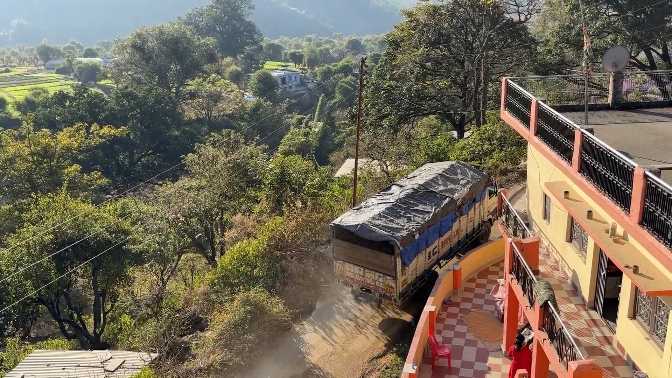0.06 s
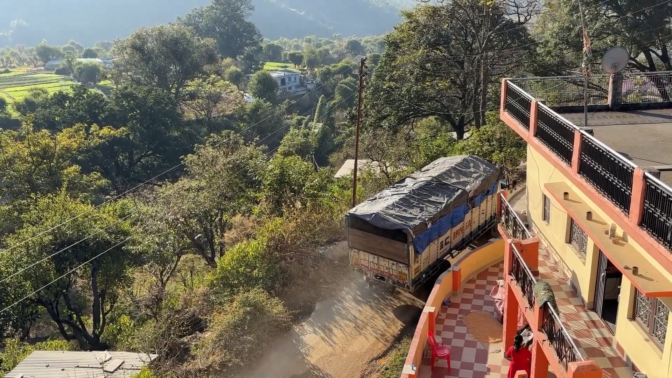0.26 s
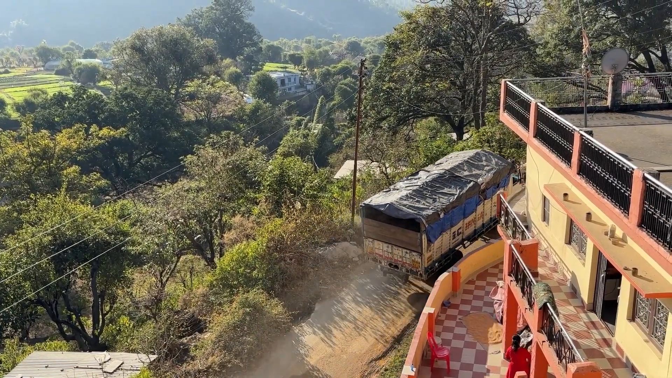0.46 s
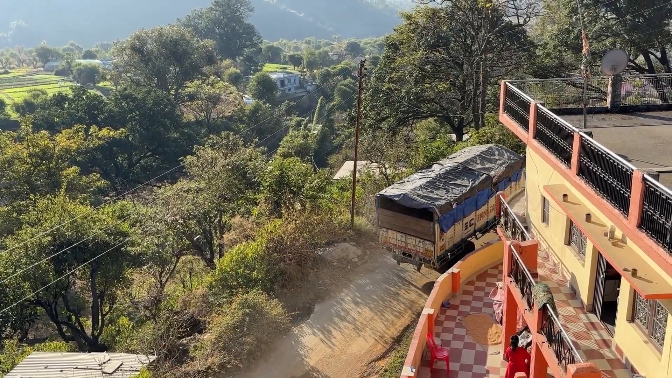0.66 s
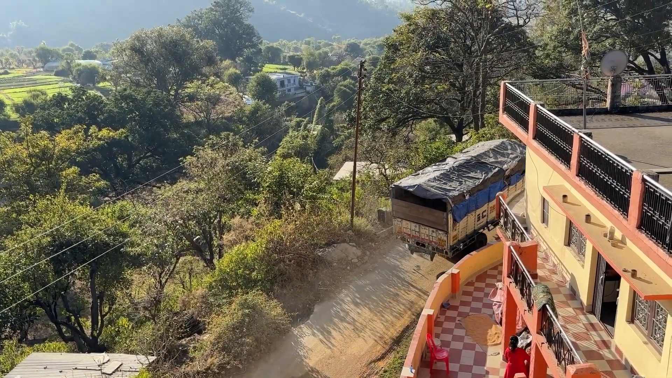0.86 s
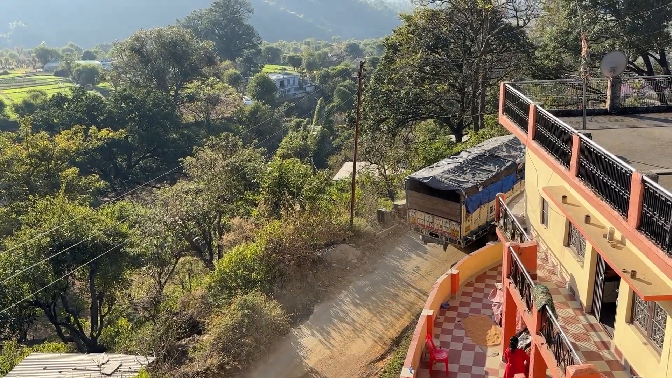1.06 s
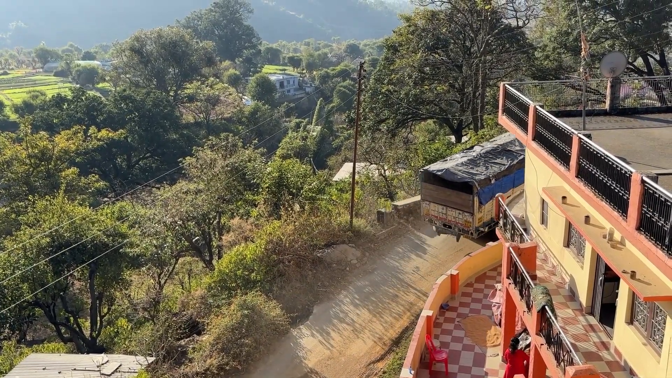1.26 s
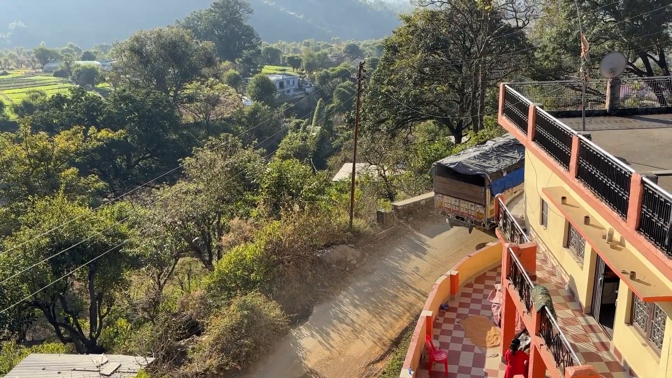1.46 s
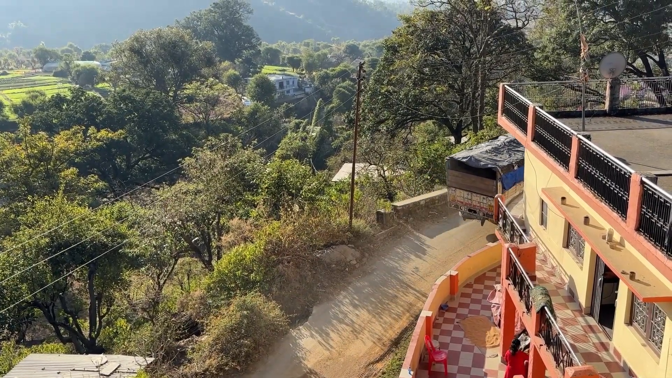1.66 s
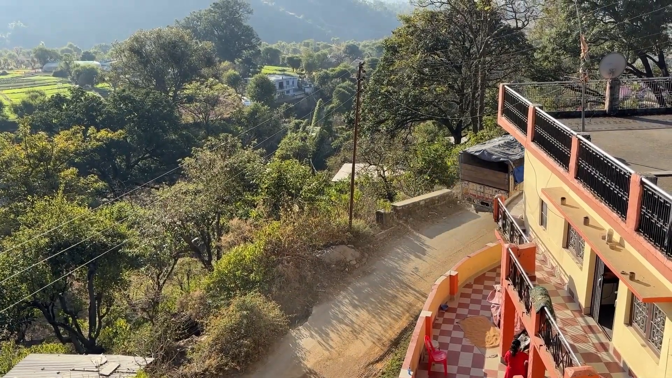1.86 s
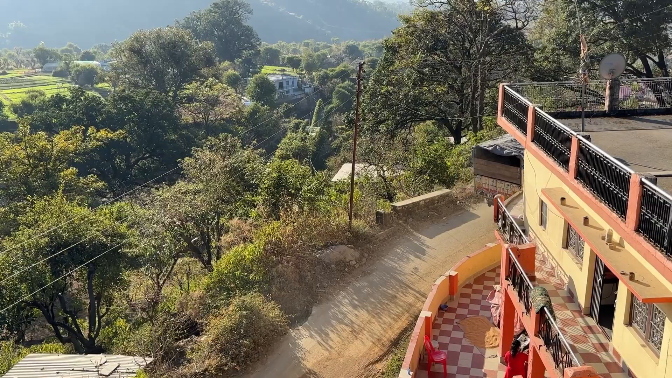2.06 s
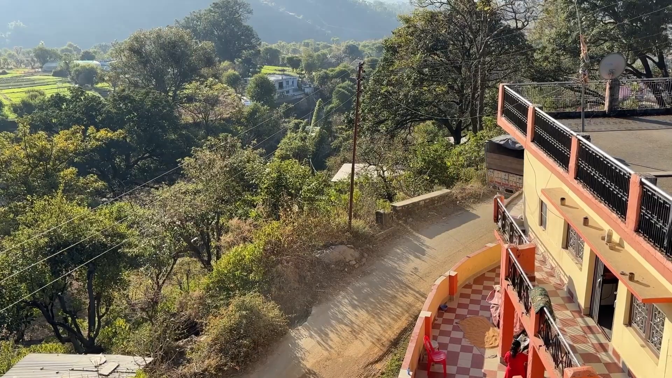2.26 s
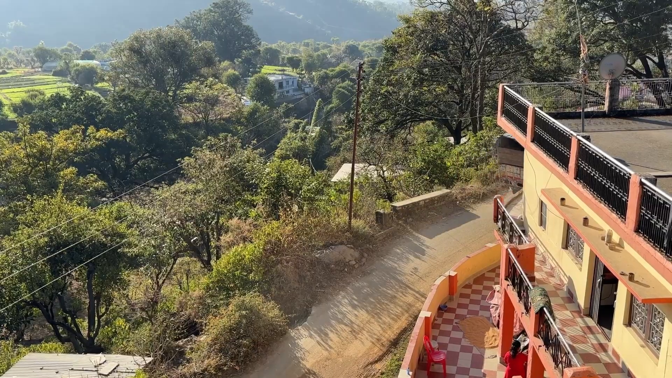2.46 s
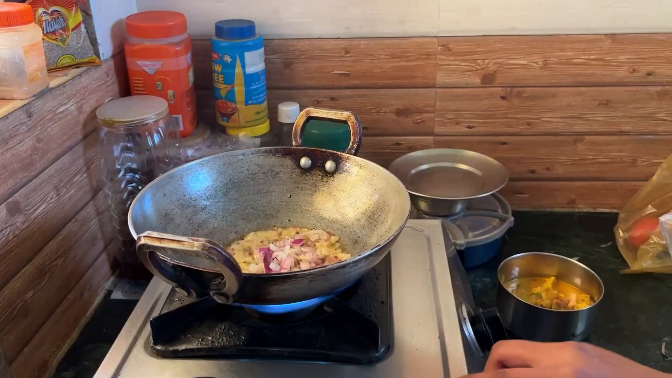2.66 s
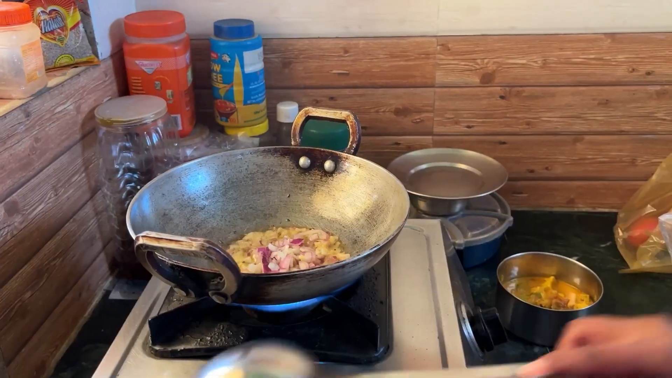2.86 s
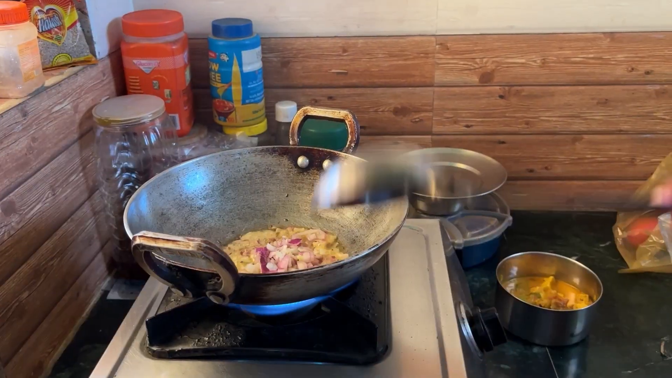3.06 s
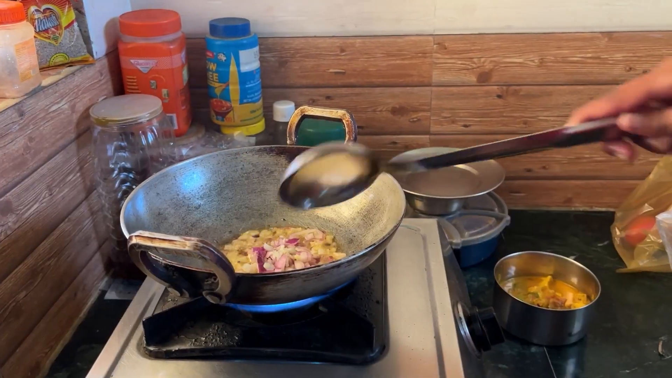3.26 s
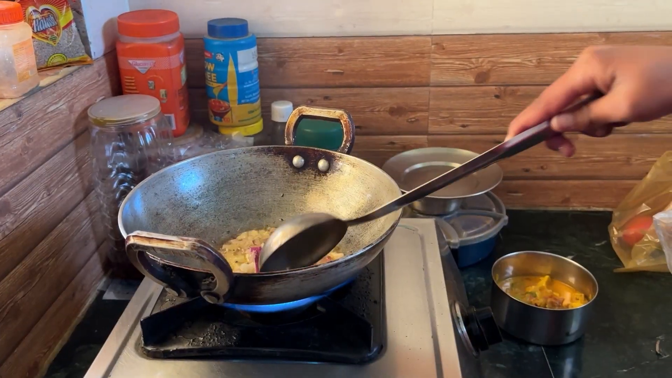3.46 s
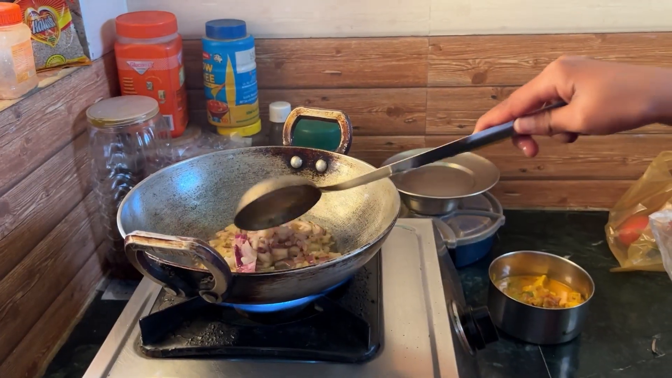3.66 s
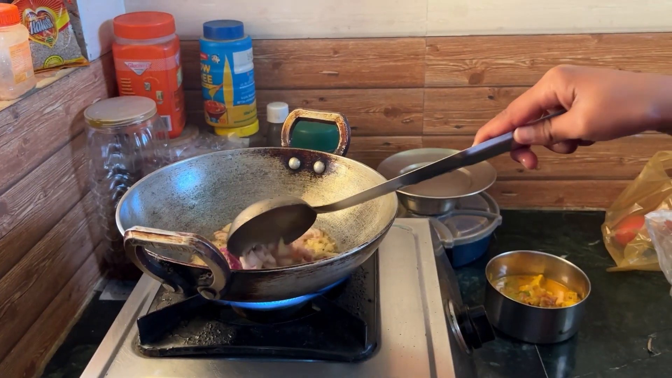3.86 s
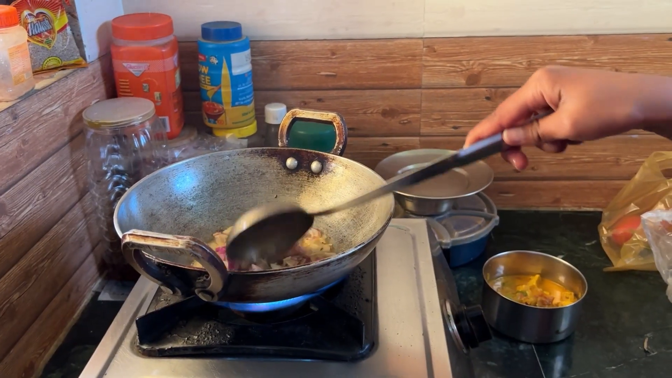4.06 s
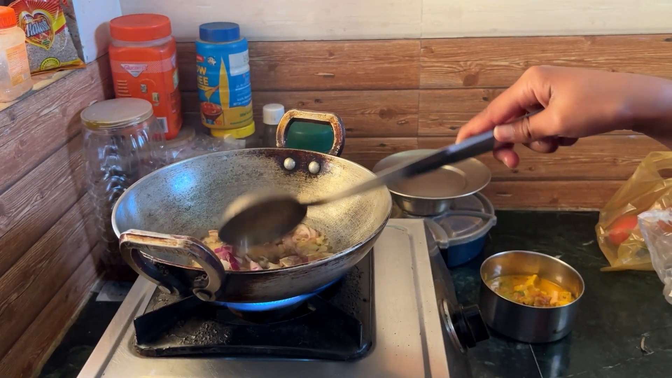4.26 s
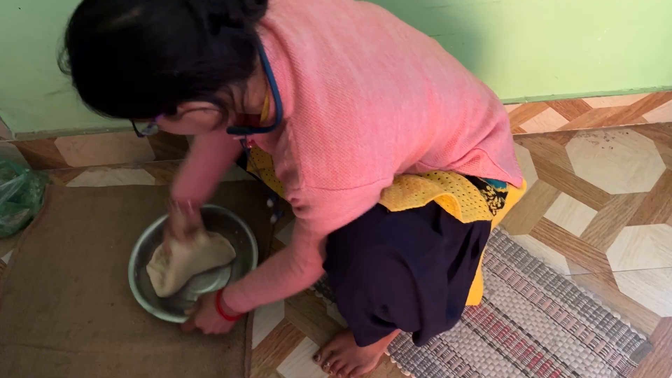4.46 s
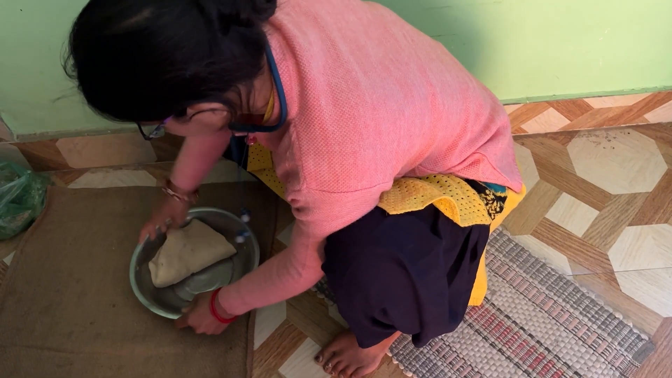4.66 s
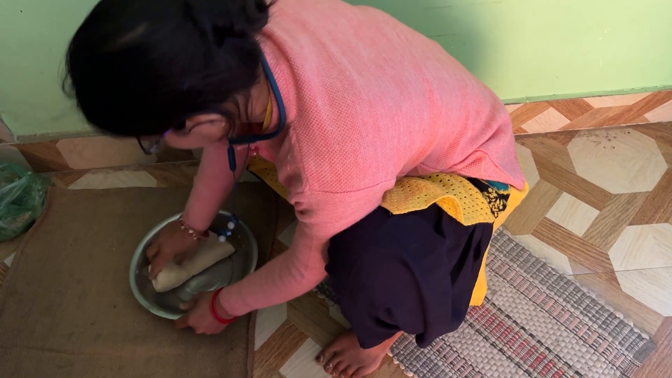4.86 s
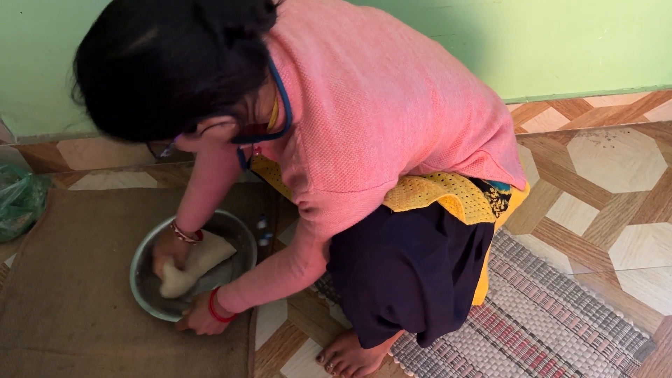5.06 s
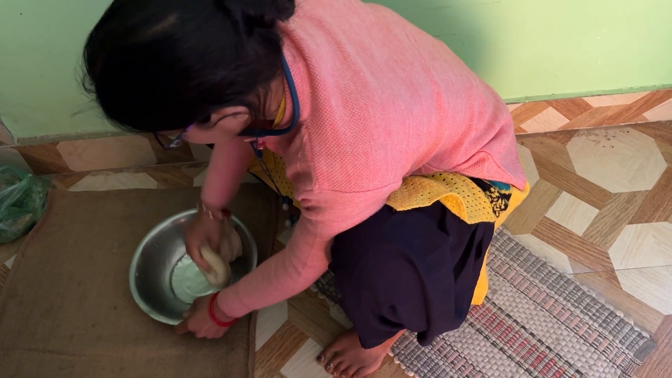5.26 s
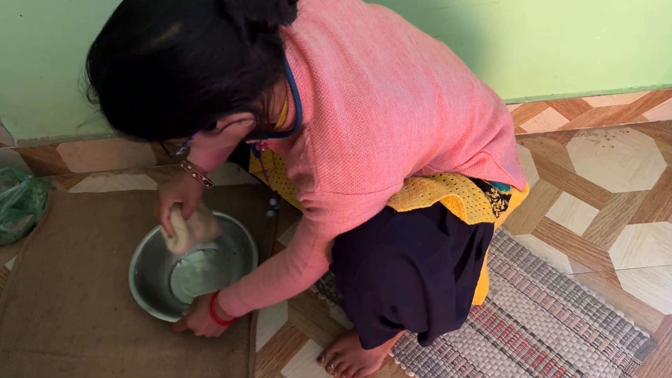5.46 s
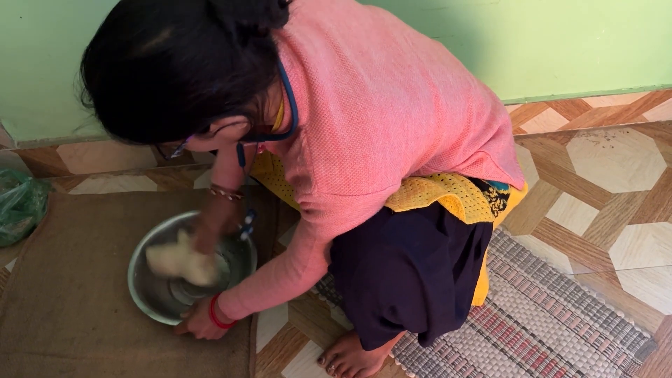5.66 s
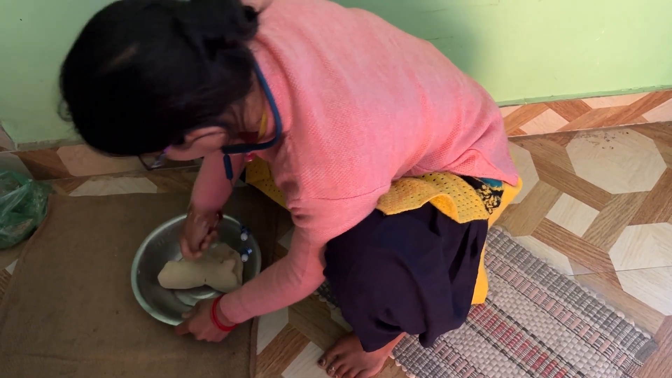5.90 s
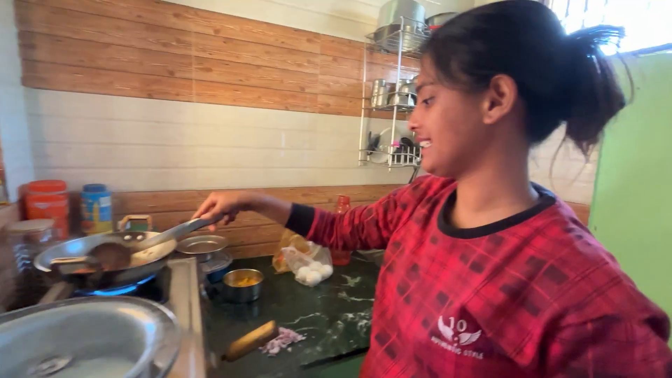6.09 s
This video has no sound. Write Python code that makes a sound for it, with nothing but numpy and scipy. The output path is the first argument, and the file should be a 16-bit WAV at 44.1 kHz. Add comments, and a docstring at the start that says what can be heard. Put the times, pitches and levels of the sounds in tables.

```python
"""Four village places, cut hard one to the next, heard in stereo through a phone's two ports.
In the lane a diesel lorry draws away behind a house: firing tones, puffed noise and a turbo whistle.
Then onions fry in a steel wok: showers of tiny bursts, snapping drops, ladle thuds, scrapes and hums.
Then, in a small room, dough is rubbed and thumped in a steel bowl whose knocks ring modes and walls.
The last place is a loud, steady rush of coloured noise."""
import sys
import numpy as np
from scipy import signal
from scipy.fft import rfft, irfft, next_fast_len
from scipy.io import wavfile
from scipy.ndimage import map_coordinates

SR = 44100
rng = np.random.default_rng(int(sys.argv[2]) if len(sys.argv) > 2 else 0)


def to_wav(sig):
    """Store sig (one row per channel, or 1-D mono) as 16-bit WAV at the path in sys.argv[1].

    Samples outside -1..1 are clipped; the rate is SR.
    """
    pcm = np.clip(np.atleast_2d(sig), -1, 1) * 32767
    pcm = np.round(pcm).astype(np.int16)
    wavfile.write(sys.argv[1], SR, pcm.T)  # frames by channels


N = 270327
TOP_HZ = 15950  # the phone's band limit

# where lane, kitchen and small room end: t/s
PLACE_ENDS = [2.523, 4.4635, 6.062]
# how widely the kitchen spreads around the microphone: f/Hz, side level/dB
WOK_WIDTH = [(60, -24), (200, -16), (380, -8.5), (700, -7), (1290, 1.5), (2380, -13), (4400, -6.5),
             (5600, 2), (8120, 10), (11000, -13.5), (15000, -5)]
# how widely the small room spreads: f/Hz, side level/dB
ROOM_WIDTH = [(60, -16), (300, -3.5), (1200, -1.5), (5000, 0.5), (12000, -3.5)]
# stirring spreads the onions over the hot steel: from t/s, to t/s
STIRRING = (3.2, 3.95)
BUBBLING_RISE_DB = 8  # gained by stirring
# the ladle is handled and pushed through the food: t/s, thud level/dB before a trim, sizzle flare/dB
LADLE_PUSHES = [(2.912, -41.5, 2.5), (2.955, -45, 2.5), (2.99, -54, 0), (3.068, -45.5, -0.5),
                (3.285, -72.5, 0.5), (3.45, -48, 1), (3.555, -73, 3.5), (3.67, -70, 1), (3.819, -41, 1),
                (3.977, -39, 4.5), (4.122, -42, 2.5), (4.295, -45, 0.5)]


def amp(db):
    """Decibels to gain."""
    return 10 ** (np.asarray(db) / 20)


def unit(x):
    """Scaled to rms 1."""
    return x / np.sqrt(np.mean(x ** 2) + 1e-20)


def along(points, hz):
    """(f/Hz, value) points read on a log frequency axis."""
    f, v = np.transpose(points)
    return np.interp(np.log(hz + 1), np.log(f + 1), v)


def curves(rows):
    """One value per sample for each column after the time."""
    s, *cols = np.transpose(rows)
    return [np.interp(np.arange(N) / SR, s, c) for c in cols]


def since(s):
    """Seconds after a moment, zero before it."""
    return np.maximum(np.arange(N) / SR - s, 0)


def wobble(rate):
    """A smooth random curve, rate knots a second."""
    knots = rng.standard_normal(int(N * rate / SR) + 4)
    return map_coordinates(knots, [np.arange(N) * rate / SR])


def fade(t, t60):
    """Free decay, 60 dB down after t60."""
    return np.exp(-np.log(1000) * t / t60)


def strokes(rows, edge_s):
    """Gain of (t/s, length/s, level/dB) strokes: each swells, holds and fades."""
    t = since(0)
    return sum(amp(db) * np.clip(np.minimum(t - s, s + length - t) / edge_s, 0, 1)
               for s, length, db in rows)


def add(track, s, sound):
    """Mix a sound into a track at a time."""
    part = track[..., round(s * SR):][..., :sound.shape[-1]]
    part += sound[..., :part.shape[-1]]


def filtered(x, response):
    """x times a complex response of frequency."""
    m = next_fast_len(N + SR // 2)
    return irfft(rfft(x, m) * response(np.fft.rfftfreq(m, 1 / SR)), m)[..., :N]


def causal(points, size=2048):
    """The minimum-phase impulse response of a spectrum, by folding its cepstrum."""
    cepstrum = irfft(np.log(amp(along(points, np.fft.rfftfreq(size, 1 / SR)))))
    cepstrum[1:size // 2] *= 2
    cepstrum[size // 2 + 1:] = 0
    return irfft(np.exp(rfft(cepstrum)))


def noise():
    """Two unrelated white noises."""
    return rng.standard_normal((2, N))


def crackle(rate, scatter_db):
    """Two streams of tiny bursts, rate a second, a few far bigger than the rest."""
    size_db = scatter_db * np.minimum(rng.exponential(size=(2, N)), 4.5)
    bursts = rng.random((2, N)) < rate / SR
    return unit(bursts * amp(size_db) * np.sign(noise()))


def spread(pair, spectrum, width, direct=0):
    """Colour two streams into stereo, mid rms 1; direct sound leads at one port (positive: left)."""
    direct = np.clip(direct, -1, 1)
    mid, stray = filtered(pair, lambda hz: amp(along(spectrum, hz)))
    side = filtered(mid, lambda hz: 1j * direct * amp(along(width, hz)))
    side += filtered(stray, lambda hz: np.sqrt(1 - direct ** 2) * amp(along(width, hz)))
    return np.array([mid + side, mid - side]) / np.std(mid)


def ports(x, lead_ms):
    """A source off to one side reaches the left port earlier by lead_ms (negative: later)."""
    return filtered(x, lambda hz: np.exp(np.outer([1j, -1j], np.pi * hz * lead_ms / 1000)))


def walls(x, reach_s, strength, count=10):
    """Weak early copies from nearby surfaces ripple the spectrum."""
    taps = np.zeros(SR // 10)
    taps[0] = 1
    delays = np.clip(rng.uniform(.15, 1, count) * reach_s, 0, .09)
    taps[(delays * SR).astype(int)] += strength * rng.choice([-1, 1], count)
    return signal.fftconvolve(x, taps[None], axes=1)[:, :N]


def echo(sound, t60s, build_s=0.0022):
    """The walls' diffuse answer to one sound, partly shared by both ports."""
    hz, t, z = signal.stft(rng.standard_normal((2, SR // 2)), SR, nperseg=256)
    z[1] *= amp(along(ROOM_WIDTH, hz))[:, None]
    decaying = z * fade(t, along(t60s, hz)[:, None])
    mid, side = signal.istft(decaying, SR, nperseg=256)[1]
    build_up = 1 - np.exp(-(np.arange(len(mid)) / SR / build_s) ** 2)
    tail = np.array([mid + side, mid - side]) * build_up
    return signal.fftconvolve(sound[None], tail / np.linalg.norm(tail[0]), axes=1)


def lorry_levels():
    """Boom, exhaust and clatter in dB: all sink with distance, and the exhaust surges under load."""
    # boom, exhaust and clatter as the lorry recedes: starting level/dB before trims, loss/dB per s
    receding = [(-33.5, 2), (-24.5, 4), (-41.5, 5.5)]
    # the exhaust surges: t/s, level/dB
    surges = [(.19, 1.5), (.75, 0.5), (.92, 1.5), (1.06, 1.5), (1.29, 1.5), (1.85, 0.5)]
    surge_s = 0.064  # from the peak to 1/e of it
    t = since(0)
    boom_db, exhaust_db, clatter_db = [db - loss * t for db, loss in receding]
    surge_db = sum(db * np.exp(-((t - s) / surge_s) ** 2) for s, db in surges)
    return boom_db, exhaust_db + surge_db, clatter_db


def lorry(cylinder_db=-1.02, waver_db=3.0, tones_db=0.06):
    """A diesel: low boom, droning pipe, a puff of exhaust and a rattle at every firing."""
    # engine speed: t/s, firing rate f/Hz
    speed = [(0, 74.7), (1.8, 74.6), (2.15, 73.7), (2.5, 73.4)]
    # boom tones: multiple of the firing rate, level/dB
    boom_orders = [(0.748, -15), (1.001, -1.5), (1.501, -15), (1.998, -17)]
    # weaker pipe tones: multiple of the firing rate, level/dB
    drone_orders = [(3.75, -20.5), (4, -19.5), (4.17, -18), (5, -15), (6.71, -18.5), (7.5, -23)]
    # three loud pipe and driveline tones: multiples of the firing rate
    loud_orders = [3, 3.36, 5.55]
    # those three tones, before trims: t/s, level/dB, level/dB, level/dB
    loud_levels = [(0.0, -32.5, -35, -28.5), (0.09, -31, -26, -27.5), (0.33, -35.5, -51, -37.5),
                   (0.49, -32.5, -28, -41), (0.65, -32.5, -34.5, -38), (0.69, -37, -31.5, -47),
                   (0.77, -34.5, -28, -28), (0.88, -32, -34.5, -45), (1.15, -45, -35.5, -36),
                   (1.4, -37, -41.5, -45.5), (1.91, -37.5, -39, -40), (2.04, -37, -41.5, -54),
                   (2.35, -43, -47, -45.5), (2.501, -37.5, -35.5, -43)]
    # exhaust colour: f/Hz, level/dB
    pipe_spectrum = [(25, -52), (50, -10), (100, -15.5), (190, -8), (235, -3), (310, -2), (400, -3.5),
                     (470, -11), (620, -13), (830, -12), (1200, -22), (2000, -39), (5000, -82)]
    # rattle colour: f/Hz, level/dB
    clatter_spectrum = [(300, -39), (800, 2.5), (1300, 8), (1900, 0.5), (2450, 3), (3700, -4.5), (4700, -8),
                        (5400, -8), (6700, -13), (7500, -60), (8400, -20.5), (11500, -22), (13500, -33),
                        (16000, -33)]
    # scatter from trees and house: f/Hz, side level/dB
    lane_width = [(60, -35), (200, -50), (700, -13), (2000, -3), (5000, -8), (15000, 2.5)]

    firing_hz, = curves(speed)
    boom_db, exhaust_db, clatter_db = lorry_levels()
    phase = 2 * np.pi * np.cumsum(firing_hz) / SR

    def tone(order):
        drifting = order * (phase + .024 * wobble(30))
        return np.sqrt(2) * np.sin(drifting + 2 * np.pi * rng.random())

    boom = amp(boom_db - 0.5) * sum(amp(db + 0.7 * wobble(13.0)) * tone(k) for k, db in boom_orders)
    drone = amp(exhaust_db) * sum(amp(db + waver_db * wobble(9.09)) * tone(k) for k, db in drone_orders)
    drone += sum(amp(db + tones_db) * tone(k) for k, db in zip(loud_orders, curves(loud_levels)))

    # unequal cylinders: the puffs swell once in every four firings, and no two burns are alike
    burn_db = cylinder_db * np.cos(phase / 4) + .5 * wobble(firing_hz.mean())
    gate = 1 + .09 * (np.cos(phase) + np.cos(2 * phase))
    puffs = unit(gate * amp(burn_db))
    exhaust = amp(exhaust_db - 2.5) * spread(puffs * noise(), pipe_spectrum, lane_width)
    # only the pipe's low notes throb unevenly
    low_notes = filtered(exhaust, lambda hz: 1 / (1 + (hz / 450) ** 8))
    exhaust += (amp(1.6 * wobble(32)) - 1) * low_notes

    rattle = walls(puffs * noise(), reach_s=.02, strength=0.093)
    clatter = amp(clatter_db + 6.0) * spread(rattle, clatter_spectrum, lane_width)
    # the house slides in front of the engine and shades its treble
    hidden, = curves([(.8, 0.019), (2.5, 0.58)])
    clatter -= hidden * filtered(clatter, lambda hz: 1 / (1 + (6000 / (hz + 1)) ** 4))
    leaning = (drone + exhaust) * amp([[-1], [.8]])  # left, right in dB
    return boom + ports(leaning + clatter, lead_ms=-0.25)


def turbo(flutter_hz=130):
    """The turbocharger's thin, fluttering whistle sinks in pitch, swells once and fades away."""
    # t/s, f/Hz, level/dB over the untrimmed clatter
    whistle_rows = [(0, 12350, -29), (.75, 12280, -24), (1.05, 12150, -32), (1.5, 12000, -45)]
    hz, over_db = curves(whistle_rows)
    whistle = np.sin(2 * np.pi * np.cumsum(hz + flutter_hz * wobble(500)) / SR)
    return amp(lorry_levels()[2] + over_db) * whistle


def sizzle_levels():
    """Fizz and bubbling in dB: both grow with the stirring and flare when wet food meets hot steel."""
    flare_s = 0.024  # a flare peaks after this long
    stirred = np.interp(since(0), STIRRING, [0, 1])
    flare_db = sum(db * since(s) / flare_s * np.exp(1 - since(s) / flare_s) for s, _, db in LADLE_PUSHES)
    fizz_db = -39.5 + 7.5 * stirred + 0.48 * flare_db  # less of the flare reaches the fizz
    bubbling_db = -45 + BUBBLING_RISE_DB * stirred + flare_db
    return fizz_db, bubbling_db


def frying(flame_db=-51):
    """Water boils out of the onions in countless bursts, above the soft roar of the gas."""
    # high sizzle: f/Hz, level/dB
    fizz_spectrum = [(1500, -32), (4000, -8.5), (6300, -0.5), (7700, -12), (9000, -3), (10800, 2.5),
                     (13000, -1), (16000, -5.5)]
    # lower sizzle: f/Hz, level/dB
    bubbling_spectrum = [(250, -31), (500, -14.5), (900, -4), (1400, 0), (2300, 4), (3500, 2.5),
                         (5000, 1.5), (7000, -6), (12000, -44)]
    # the gas flame: f/Hz, level/dB
    flame_spectrum = [(15, -44), (25, -16), (91, 5), (151, 0), (179, -0.5), (211, 1.5), (308, -7.5),
                      (700, -3.5), (910, -4), (1540, -120)]
    fizz_db, bubbling_db = sizzle_levels()

    def in_wok(bursts):
        return walls(bursts + .5 * noise(), reach_s=.012, strength=.085, count=14)

    fizz_bursts = in_wok(crackle(rate=2700, scatter_db=3.5))
    fizz = spread(fizz_bursts, fizz_spectrum, WOK_WIDTH, direct=-0.93)
    bubbling_bursts = in_wok(crackle(rate=2000, scatter_db=2.5))
    bubbling = spread(bubbling_bursts, bubbling_spectrum, WOK_WIDTH, direct=-0.37)
    flame = amp(flame_db + 1.5 * wobble(14)) * spread(noise(), flame_spectrum, WOK_WIDTH)
    fizz *= amp(fizz_db + 1.6 * wobble(40) + 0.66 * wobble(14))
    bubbling *= amp(bubbling_db + 2.3 * wobble(30))
    return fizz + bubbling + flame


def droplets(count=60):
    """Drops crackle at random moments, louder once stirred: rows of t/s, level/dB, f/Hz."""
    middle_db, scatter_db, highest_hz, octaves = -25, 4, 9000, 1.5
    when, size, pitch = rng.random((count, 3)).T
    s = PLACE_ENDS[0] + when * (PLACE_ENDS[1] - PLACE_ENDS[0])
    stirred_db = BUBBLING_RISE_DB * np.interp(s, STIRRING, [-.5, .5])
    db = middle_db + scatter_db * (2 * size - 1) + stirred_db
    return list(zip(s, db, highest_hz * 2 ** (-octaves * pitch)))


def spits(cycles=10, splash_db=-18.5, splash_t60=0.037):
    """A bursting drop snaps for a few cycles; the wok's wall throws back a short splash."""
    # drops burst in the oil at set moments, some loud, some faint: t/s, level/dB, f/Hz
    set_drops = [(2.5615, -17, 10200), (2.6245, -17, 11900), (2.6390, -9, 12500), (2.752, -22, 5800),
                 (2.7725, -21, 4600), (2.8772, -23, 3400), (2.9440, -16, 11000), (2.9560, -11, 4470),
                 (3.0255, -23, 5100), (3.089, -18, 11500), (3.097, -18, 10000), (3.152, -22, 4800),
                 (3.1968, -8.5, 12200), (3.2665, -11, 11000), (3.2962, -10, 6500), (3.365, -19, 4350),
                 (3.5452, -19, 5300), (3.5600, -12, 10500), (3.621, -13, 10000), (3.673, -18, 6400),
                 (3.711, -13, 11500), (3.8195, -9, 4600), (3.8446, -11, 12300), (3.924, -19, 4700),
                 (3.9710, -13, 5800), (3.9785, -7, 11200), (4.0057, -14, 4050), (4.1298, -3, 12200),
                 (4.2897, -17, 3800), (4.312, -8, 11900), (4.3655, -2, 11900), (4.411, -11, 10300),
                 (4.4507, -11, 11800)]
    out, t = np.zeros((2, N)), np.arange(SR // 20) / SR
    for s, db, hz in set_drops + droplets():
        snap = np.sin(2 * np.pi * hz * t + [[.4], [-.4]]) * fade(t, cycles / hz)
        splash_gain = amp(splash_db) * fade(t, splash_t60) + 0.13 * fade(t, 0.001)
        scatter = rng.standard_normal((2, len(t))) * splash_gain
        band = signal.butter(1, [hz * 0.53, min(hz * 2.7, TOP_HZ)], "band", fs=SR, output="sos")
        add(out, s, amp(db) * (snap + signal.sosfilt(band, scatter)))
    return out


def ladle(attack=0.017, t60=0.23, thud_db=5):
    """Cushioned by the food, each push of the ladle is a low, blurred thud."""
    # a soft push on the wok: f/Hz, level/dB
    thud_spectrum = [(30, -20), (90, -13), (170, -17), (290, 1.5), (430, -5), (700, -8.5), (1500, -31)]
    push = sum(amp(db + thud_db) * (1 - np.exp(-since(s) / attack)) * fade(since(s), t60)
               for s, db, _ in LADLE_PUSHES)
    return push * spread(noise(), thud_spectrum, WOK_WIDTH)


def wok_hums(edge_s=0.012):
    """Low, uneven hums and rumbles as the heavy wok is nudged and handled."""
    # t/s, length/s, level/dB, f/Hz
    hums = [(2.925, .1, -47, 182), (3.005, .14, -50, 181), (2.93, .06, -49, 100), (3.45, .35, -62, 110),
            (3.85, .12, -54, 100.8), (4.06, .2, -55, 54)]

    def uneven_hum(hz):
        return amp(3 * wobble(55)) * np.sin(2 * np.pi * hz * since(0) + .35 * wobble(45))

    return sum(strokes([row], edge_s) * np.sqrt(2) * uneven_hum(hz) for *row, hz in hums)


def scraping(edge_s=0.0083):
    """The ladle's edge sticks and slips so fast that each scrape is one rough burst."""
    # the ladle grates over the steel: t/s, length/s, level/dB
    scrapes = [(3.268, 0.044, -36.5), (3.362, 0.028, -47), (3.998, 0.034, -40)]
    # its colour: f/Hz, level/dB
    grating_spectrum = [(1200, -37), (2200, -4), (4000, 3), (6200, 4), (7500, -25), (14000, -30)]
    slips = crackle(rate=1800, scatter_db=4.5)
    return strokes(scrapes, edge_s) * spread(slips, grating_spectrum, WOK_WIDTH, direct=-0.6)


def quiet_room(hush_db=-54):
    """The small room's faint, steady background is coloured noise."""
    # f/Hz, level/dB
    hush_spectrum = [(15, -34), (25, -11), (49, -5), (72, -3.5), (211, -5.5), (572, -8.5), (1090, -5),
                     (1320, -8), (2810, -9), (6140, -7), (7830, -15.5), (12100, -8.5), (15800, -22)]
    return amp(hush_db) * spread(noise(), hush_spectrum, ROOM_WIDTH)


def kneading(push_edge_s=0.056, rustle_edge_s=.02):
    """The hand slides the soft dough over the steel, and faint high rustles come and go."""
    # the hand pushes the dough: t/s, length/s, level/dB
    pushes = [(4.45, 0.23, -52), (4.91, 0.32, -49), (5.64, 0.22, -50)]
    # dough sliding on steel: f/Hz, level/dB
    rub_spectrum = [(100, -5), (300, 10.5), (750, 1), (1500, -3), (3500, -13.5), (5200, -6.5), (7000, -19),
                    (14000, -12)]
    # faint high rustles: t/s, length/s, level/dB
    rustles = [(4.755, 0.057, -52.5), (5.17, 0.096, -56.5), (5.32, 0.11, -58.5)]
    # its colour: f/Hz, level/dB
    rustle_spectrum = [(5000, -28), (9000, -5), (11500, -1), (15500, -9)]
    slide = spread(crackle(rate=7000, scatter_db=2), rub_spectrum, ROOM_WIDTH)
    rustle = spread(crackle(rate=9000, scatter_db=3), rustle_spectrum, ROOM_WIDTH)
    return strokes(pushes, push_edge_s) * slide + strokes(rustles, rustle_edge_s) * rustle


def low_thumps(attack=0.0029, blur=0.16):
    """Low thumps of dough and the bowl's low ring, blurred by a random wander of pitch."""
    # t/s, level/dB, f/Hz, t60/s
    thumps = [(4.506, -46, 334, .048), (4.555, -38.5, 382, 0.05), (4.811, -32.5, 530, 0.22),
              (4.95, -52, 219, 0.47), (5.04, -37.5, 452, 0.18), (5.099, -44.5, 332, 0.28),
              (5.145, -50, 319, 0.17), (5.711, -32.5, 192.2, 0.092)]

    def blurred_note(hz):
        return 2 * np.sin(2 * np.pi * np.cumsum(hz * np.exp(blur * wobble(300))) / SR)

    return sum(amp(db) * blurred_note(hz) * (1 - np.exp(-since(s) / attack)) * fade(since(s), t60)
               for s, db, hz, t60 in thumps)


def bowl(clack_db=9, room_db=-5.5, crack_t60=0.016, click=1.9, grit=0.84, pop_rise_s=0.00021):
    """Bowl knocks and a faint rustle: edge click, then base pop, both ringing the steel and the room."""
    # bowl knocks and a faint rustle at 5.115 s (levels before trims): t/s, edge click level/dB,
    # hardness (0-1), dull above f/Hz, rim snap level/dB, snap f/Hz, snap t60/s, base lands after t/s,
    # base pop level/dB, pop f/Hz, pop t60/s, hollow note f/Hz, its level/dB over the pop,
    # ring level/dB over the clack
    knocks = [(4.551, -62, 0, 2500, -73, 1700, .02, 0.0021, -45.5, 1078, 0.089, 420, -5, -16),
              (4.5865, -18, 0.45, 3200, -23, 2280, 0.078, 0.00101, -17, 1710, 0.0067, 744, -11.5, -5),
              (4.8092, -20.5, 0.9, 3400, -25, 4300, 0.012, 0.0022, -16, 1440, 0.0053, 1000, -4.5, -7.5),
              (5.0402, -44, 0, 1800, -40, 1650, .015, 0.00023, -25, 1070, 0.0055, 480, -9, -11),
              (5.115, -50, 0.5, 2000, -65, 2400, .02, .002, -49, 1050, .02, 850, -10, -11),
              (5.696, -36, 0.9, 6000, -50, 2200, .017, 0.0018, -39, 1000, .0066, 700, -7, -10),
              (5.7016, -26, 1, 6000, -41, 2220, .017, .001, -30, 1400, 0.0073, 800, -9, -10),
              (5.7094, -11.5, 1, 5000, -16.5, 4750, 0.0092, 0.003566, -10, 1105, 0.018, 835, -9, -7.5),
              (5.7135, -26, 1, 4500, -23, 3200, .008, 0.00103, -29, 1560, 0.0089, 755, -6, -7),
              (5.7215, -28, 1, 8000, -38, 3000, .017, .002, -34, 1000, .008, 696, -6, -10),
              (5.7292, -18, 0.9, 3500, -24, 3800, .008, 0.00028, -16.5, 1250, 0.006, 810, -4.5, -2.5),
              (5.8494, -64, .1, 1800, -60, 1700, .017, .0025, -34, 1080, .023, 850, -2, -7)]
    # modes of the steel: f/Hz, level/dB, t60/s
    modes = [(484, 4, .3), (560, 1, .25), (665, 7, .29), (721, 3, .33), (836, 4, .38), (905, -1, .3),
             (1001, 0, .33), (1103, -3, .25), (1250, -2, .22), (1319, 1, .22), (1359, 0, .3),
             (1443, 1, .22), (1575, 5, .22), (1635, 4, .2), (1761, -2, .21), (1947, 5, .2), (2076, 4, .2),
             (2225, 6, .24), (2320, 5, .24), (2660, 0, .17), (3386, -7, .13)]
    # the dough damps the knock: f/Hz, level/dB
    dulling = [(60, -36), (250, -10), (500, -6), (700, -1), (1500, 2), (2350, 3), (2800, -3), (3400, 4),
               (4200, -5.5), (4850, -6), (5400, -8), (7000, -12), (9000, -46), (16000, -45)]
    # the small room's decay: f/Hz, t60/s
    room_decay = [(150, 1), (550, 0.41), (850, 0.36), (1300, 0.18), (2000, 0.34), (3000, 0.31),
                  (5000, 0.33), (12000, 0.12)]
    # the bowl reaches the two ports out of step: f/Hz, left lead/rad
    port_lead = [(500, .05), (700, .25), (950, 1.15), (2300, 1.25), (3200, .1), (6000, 0)]
    # the bowl's low notes lean right, its higher notes left: f/Hz, left minus right level/dB
    port_lean = [(600, -3.5), (1100, -1.8), (2000, 2.3), (4000, .5)]

    near, far, t = np.zeros((2, N)), np.zeros((2, N)), np.arange(SR // 2) / SR
    dense = signal.butter(2, 1400, "high", fs=SR, output="sos")

    def note(age, hz, t60):
        return np.sin(2 * np.pi * hz * age) * fade(age, t60)

    for (s, edge_db, hardness, dull_hz, snap_db, snap_hz, snap_t60, settle_s,
         pop_db, pop_hz, pop_t60, hollow_hz, hollow_db, ring_db) in knocks:
        # bare steel on stone: one hard click with a little grit
        crack = click * (t == 0) + grit * rng.standard_normal(len(t)) * fade(t, crack_t60)
        edge = (1 - .5 * hardness) * note(t, 2440, 0.0028) + hardness * crack
        landed = np.maximum(t - settle_s, 0)
        hollow = amp(hollow_db) * note(landed, hollow_hz, 0.009)  # the whole bowl
        base = (note(landed, pop_hz, pop_t60) + hollow) * (1 - np.exp(-landed / pop_rise_s))
        snap = amp(snap_db) * note(t, snap_hz, snap_t60)
        cushion = signal.butter(2, min(dull_hz, TOP_HZ), fs=SR, output="sos")
        contact = signal.sosfilt(cushion, amp(edge_db) * edge + amp(pop_db + 2.5) * base)
        clack = amp(clack_db) * signal.fftconvolve(contact, causal(dulling))[:len(t)]
        steel = sum(amp(db + rng.normal(0, 0.87)) * np.sin(2 * np.pi * (hz * t + rng.random())) * fade(t, t60)
                    for hz, db, t60 in modes)
        # the countless higher modes blur into a brief crash
        crash = signal.sosfilt(dense, rng.standard_normal(len(t)))
        steel += amp(24) * crash * fade(t, 0.11)
        ring = signal.fftconvolve(clack, steel)[:len(t)]
        ring *= amp(ring_db) * np.linalg.norm(clack) / np.linalg.norm(ring)
        add(near, s, clack + ring + snap)
        add(far, s, amp(room_db) * echo(clack, room_decay))
    near = filtered(near, lambda hz: np.exp(np.outer([.5j, -.5j], along(port_lead, hz))))
    return filtered(near + far, lambda hz: amp(np.outer([.5, -.5], along(port_lean, hz))))


def floor_boom(attack=0.0047, level_db=-42.5, t60=0.78):
    """The floor and the room rumble on after the hardest throw."""
    # f/Hz, level/dB
    boom_spectrum = [(20, -21), (36, 6), (60, 4.5), (90, -1.5), (130, 0), (180, -14), (280, -8.5),
                     (450, -13), (800, -35)]
    t = since(5.71)
    swell = 1 - np.exp(-t / attack)
    return amp(level_db) * swell * fade(t, t60) * spread(noise(), boom_spectrum, ROOM_WIDTH)


def closing_rush(rush_db=-30):
    """A loud, steady rush of coloured noise."""
    # f/Hz, level/dB
    rush_spectrum = [(18, -30), (30, -11), (238, -1), (362, -10), (424, -3.5), (981, -17), (1450, -12),
                     (1790, -16.5), (3940, -17.5), (13500, -21), (15800, -28)]
    return amp(rush_db) * spread(noise(), rush_spectrum, ROOM_WIDTH)


def scene():
    """Four places, each cut in where the last one ends."""
    t = np.arange(N) / SR
    kitchen, floor = [np.clip((t - s) / 0.00069, 0, 1) for s in PLACE_ENDS[:2]]
    last = np.clip((t - PLACE_ENDS[2]) / 0.026, 0, 1)
    lane_sound = lorry() + turbo()
    kitchen_sound = frying() + spits() + ladle() + wok_hums() + scraping()
    floor_sound = quiet_room() + kneading() + low_thumps() + bowl() + floor_boom()
    return ((1 - kitchen) * lane_sound + (kitchen - floor) * kitchen_sound
            + (floor - last) * floor_sound + last * closing_rush())


def record(dry):
    """The phone rounds off the biggest peaks and keeps nothing above its band limit."""
    rounded = dry / (1 + np.abs(dry / .92) ** 6) ** (1 / 6)
    return filtered(rounded, lambda hz: hz < TOP_HZ)


dry = scene()
out = record(dry)
to_wav(out)
```